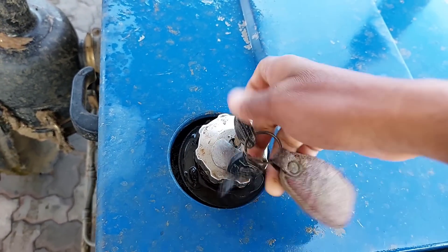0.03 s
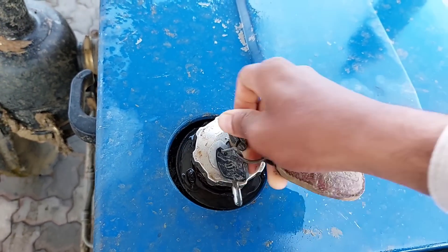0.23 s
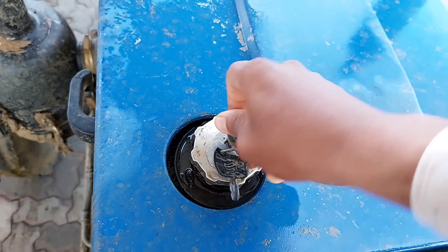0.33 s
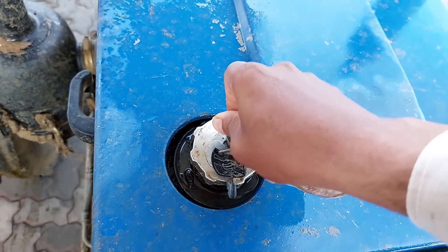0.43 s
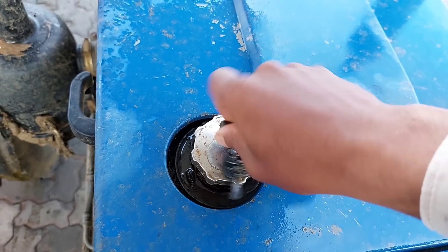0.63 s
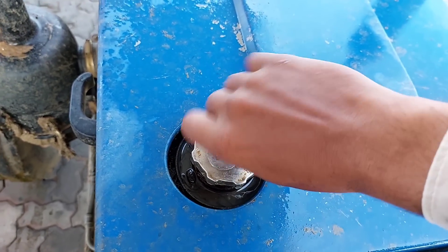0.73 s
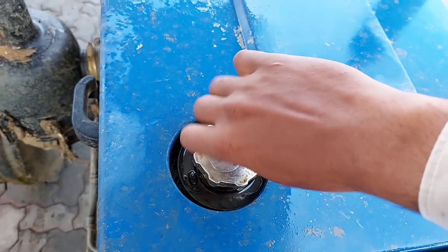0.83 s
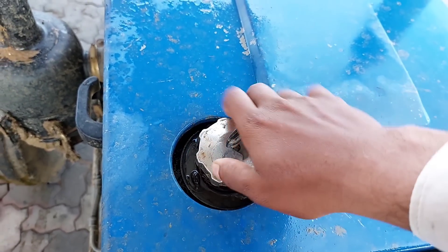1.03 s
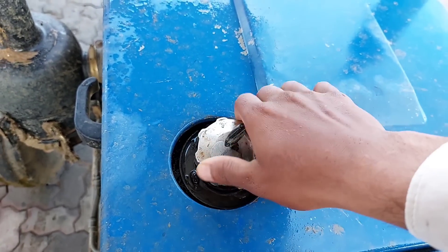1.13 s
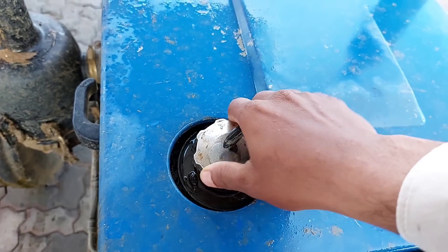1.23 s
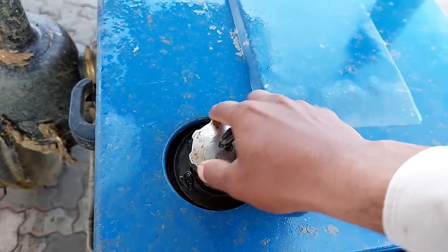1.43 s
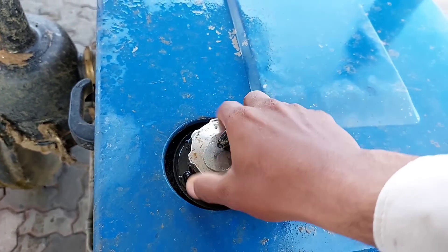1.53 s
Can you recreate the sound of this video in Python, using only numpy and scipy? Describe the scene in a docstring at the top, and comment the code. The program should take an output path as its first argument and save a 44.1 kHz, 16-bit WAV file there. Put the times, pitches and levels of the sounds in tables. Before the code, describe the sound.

Close to the microphone outdoors, a metal fuel cap is unlocked: small key clicks, a short scrape with dull thuds, then sharp snaps and a hollow ring from the tank. A bird whistles very faintly far away.

```python
"""A key ticks and rasps into the lock of a metal fuel cap, outdoors, close to a phone's microphones.
It scrapes over the pins and shakes the painted panel; the cap snaps, comes loose and the hollow
tank rings. Behind it lie a low rumble, a thin hiss and, far off, a faint falling whistle,
probably a bird."""
import sys
import numpy as np
from scipy import signal
from scipy.fft import rfft, irfft
from scipy.io import wavfile
from scipy.ndimage import uniform_filter1d

SR = 44100
rng = np.random.default_rng(int(sys.argv[2]) if len(sys.argv) > 2 else 0)


def transcribe(signal):
    """Save signal, clipped to [-1, 1], as a 16-bit WAV file at the path in sys.argv[1]."""
    frames = np.atleast_2d(signal).T
    limited = np.clip(frames, -1, 1)
    pcm = np.round(limited * 32767).astype(np.int16)
    wavfile.write(sys.argv[1], SR, pcm)


N = 70560
T = np.arange(N) / SR
FREQS = np.maximum(np.fft.rfftfreq(N, 1 / SR), 1)

# A click coming back off the bodywork. Each row: frequency in Hz, level in dB, 60 dB decay in seconds.
BODYWORK_ECHO = [(980, -43.5, 0.58), (2390, -43.5, 0.24), (4620, -40.5, 0.058), (7100, -35.5, 0.39),
                 (10100, -51.5, 0.33), (16000, -42, 0.21)]


def key_ticks():
    """The key and its ring tick against the cap, mostly left of centre; glancing touches are thinner."""
    # Each row: start in seconds, level in dB, lean to the left in dB, ring length factor, low cut in Hz.
    touches = [(0.0392, -23.5, 5.5, 0.99, 9500), (0.1397, -10, 13, 1, 510), (0.1654, -17.5, -1, 0.48, 5100),
               (0.45, -35, 5, 1, 3000), (0.5501, -23.5, 12.5, 0.83, 500), (0.562, -26.5, 10, 0.23, 2460),
               (0.708, -37, 16, 0.18, 2960), (0.7232, -32, 18, 0.21, 2900), (0.739, -35, 4, .4, 11000),
               (.752, -28.5, 19, 0.18, 11200), (0.7712, -34, 6, 0.33, 6000), (0.786, -27.5, 2, 0.75, 6100),
               (0.789, -29, 11.5, 0.25, 5950), (0.896, -42, 14, 0.81, 5100)]
    # The modes each key tick strikes: a low ring of the cap body at 845 Hz, then the key's own modes. Each row:
    # frequency in Hz, level in dB, base 60 dB decay in seconds.
    tick_modes = [(845, -44, .35), (2980, -27, .02), (5200, -16, .012), (6150, -6, .005), (6600, -2, .008),
                  (7400, -11, .012), (7900, -16, .008), (8570, -16, .015), (8950, -14, .009),
                  (10000, -17, .005), (10800, -17, .007), (11400, -13, .008), (14330, -14, .007)]
    echo, out = wash(BODYWORK_ECHO), 0
    for start, db, left_db, length, low_hz in touches:
        low_cut = signal.butter(2, low_hz, "high", fs=SR, output="sos")
        tick = signal.sosfilt(low_cut, click(tick_modes, length) + echo)
        out = out + at(tick * undb(db) * pan(left_db), start)
    return out


def cap_snaps():
    """The lock and the cap's lugs snap, and the bodywork throws the sound back."""
    # Each row: start in seconds, level in dB, lean to the left in dB, ring length factor.
    snaps = [(0.9284, -8.5, 14, 0.85), (0.994, -18, 0, 0.69), (1.045, -25.5, 9, 0.38),
             (1.1125, -33, 8, 0.22), (1.117, -26, 4, 0.11), (1.1322, -27, 13, 0.23),
             (1.138, -22.5, 8, 0.51), (1.190, -34, 11, 0.24), (1.203, -25, 1, 0.17), (1.218, -27, 10, 0.12),
             (1.2325, -7.5, 9.5, .6), (1.243, -25, 1.5, 1.5)]
    # The cap's modes. Each row: frequency in Hz, level in dB, base 60 dB decay in seconds.
    cap_modes = [(2985, -14, .022), (4100, -20, .01), (4650, -15, .008), (5500, -11, .012),
                 (5900, -8, .011), (6250, -15, .009), (7100, -18, .012), (7590, -18, .045),
                 (8750, -11, .012), (11520, -22, .022), (12300, -21, .008), (13250, -15, .02),
                 (14800, -21, .009), (15600, -21, .006)]
    echo = undb(-3.5) * wash(BODYWORK_ECHO)
    return sum(at((click(cap_modes, length) + echo) * undb(db) * pan(left_db), start)
               for start, db, left_db, length in snaps)


def click(modes, length):
    """Metal meets metal: a crack of contact noise and modes that differ a little with each grip."""
    # The contact noise. Each row: frequency in Hz, relative level in dB.
    crack_colour = [(1000, -48), (2400, -1), (3200, 1), (4200, -0.5), (5500, 7.5), (7000, -7), (9000, -2),
                    (10000, -7.5), (13000, 3), (16000, -7.5)]
    scatter = rng.standard_normal((len(modes), 2))
    struck = [(hz * (1 + .005 * detune), db + extra_db, t60)
              for (hz, db, t60), (detune, extra_db) in zip(modes, scatter)]
    crack = undb(-11.5) * noise(crack_colour) * decay(t60=.01)
    return (ring(struck, length, lag_s=.00009) + crack) * rise(seconds=.00016)


def pin_rasps():
    """The key rasps over the lock pins on its way in."""
    # Each row: start in seconds, relative level in dB, length in seconds.
    rasps = [(.246, -38.5, 0.014), (.2555, -21, 0.0029), (.2605, -24.5, 0.0096), (.2655, -45, 0.0073),
             (.2715, -17, 0.004), (.2795, -31, 0.011), (.287, -33, 0.023), (.3195, -24.5, 0.0035),
             (.325, -40.5, 0.011), (.349, -36, 0.0042)]
    # Each row: frequency in Hz, relative level in dB.
    rasp_colour = [(400, -28), (1400, 5), (2600, -6), (4000, -10), (6000, -6), (9000, -8), (16000, -11.5)]
    return undb(-11.5) * friction(rasps, rasp_colour, rough=.73)


def finger_rubs():
    """Fingers and key fob rub on the cap."""
    # Each row: start in seconds, level in dB, length in seconds.
    rubs = [(.555, -56.5, 0.099), (.695, -53.5, 0.11), (.80, -62.5, 0.13), (.93, -45, 0.14),
            (1.11, -44.5, 0.2)]
    # Each row: frequency in Hz, relative level in dB.
    rub_colour = [(200, 11.5), (700, 9), (1400, 6), (2000, -10.5), (5000, -4), (9000, -8.5), (16000, -14)]
    return friction(rubs, rub_colour, rough=.51)


def friction(strokes, colour, rough, grains_per_s=2700):
    """Stick-slip grains under strokes that swell quickly and die away."""
    force = 0
    for start, db, length in strokes:
        age = np.maximum(T - start + length / 10, 0) / length
        force = force + undb(db) * (1 - np.exp(-age * 10)) * np.exp(-age ** 2)
    grains = (rng.random(N) < grains_per_s / SR) * rng.standard_normal(N)
    grit = rough * unit(grains) + rng.standard_normal((2, N))
    scrape = unit(irfft(rfft(grit) * undb(along(FREQS, colour)), N))
    return force * scrape * pan(left_db=5.5)


def panel_thuds():
    """Each push on the cap thuds through the sheet metal."""
    # Each row: start in seconds, level in dB, treble cutoff in Hz.
    pushes = [(.140, -15.5, 3000), (.257, -8, 990), (.269, 0.5, 1050), (.2852, -1.5, 525), (0.322, -7, 910),
              (0.3506, -9, 457), (0.93, -6.5, 1490), (0.954, -3, 476)]
    # The panel's distinct modes, then the dense ones between them.
    # Each row: frequency in Hz, level in dB, 60 dB decay in seconds.
    panel_modes = [(92, -31, .13), (184, -34, .31), (250, -40, .25), (300, -31, .16), (390, -34, .14),
                   (470, -38, .2), (584, -35, .24), (790, -36, .15), (1336, -38, .2)]
    dense_modes = [(130, -49, .13), (200, -45, .17), (330, -40, .19), (600, -38, .19), (1300, -39, .17),
                   (2200, -47, .14), (5000, -60, .1)]
    thud = (ring(panel_modes) + wash(dense_modes)) * rise(seconds=.0027)
    return sum(at(soften(thud, hz) * undb(db), start) for start, db, hz in pushes)


def hollow_tank():
    """The cap breaks free and the hollow tank rings; later bumps stir its dense modes."""
    # Each row: start in seconds, level in dB, treble cutoff in Hz.
    blows = [(1.007, 3, 12400), (1.118, 3, 602), (1.232, -4.5, 497)]
    # The tank's distinct modes, then the dense ones between them.
    # Each row: frequency in Hz, level in dB, 60 dB decay in seconds.
    tank_modes = [(109, -41, 1.5), (128, -38, 1.6), (253, -48, 1.3), (313, -41, 1.3), (442, -44, 1.5),
                  (532, -45, 1.2), (708, -42, .85), (802, -37, 1.3), (1058, -36, .38), (1308, -43, .5),
                  (1426, -36, .32), (1540, -39, .34), (1689, -40, .42), (1771, -41, .35), (1974, -39, .42),
                  (2336, -37, .35), (2946, -38, .27)]
    dense_modes = [(80, -48, 1), (202, -51.5, 1), (326, -44, 1), (530, -51, 0.78), (766, -34, 0.5),
                   (1110, -37, 0.27), (1600, -36.5, 0.68), (2280, -33.5, 0.34), (4100, -36, 0.28),
                   (5840, -44, 0.23), (10000, -41, 0.13), (16000, -37, 0.051)]
    # The treble favours the left microphone. Each row: frequency in Hz, left over right in dB.
    tank_lean = [(400, -0.5), (750, 2), (1300, 4), (4400, 6), (8000, 10), (15000, 13)]
    attack = rise(seconds=.00067)
    stirred = sum(at(soften(wash(dense_modes) * attack, hz) * undb(db), start) for start, db, hz in blows)
    ringing = at(ring(tank_modes) * attack, start=blows[0][0])
    return lean(stirred + ringing, tank_lean)


def far_bird(fall_hz_per_s=13000, lowest_hz=2897):
    """A far whistle holds, then falls, and reaches the phone as a blur of echoes."""
    # Each row: start in seconds, opening pitch in Hz, level in dB, hold and length in seconds.
    whistles = [(0.066, 3516, -58.5, 0.012, 0.14), (0.382, 3360, -55.5, 0.044, 0.19),
                (0.787, 3334, -56, 0.055, 0.21)]
    echoes = unit(rng.standard_normal((2, N)) * decay(t60=.45)) / np.sqrt(N)
    calls = 0
    for start, hz, db, hold, length in whistles:
        age = T - start
        pitch = np.maximum(hz - fall_hz_per_s * np.maximum(age - hold, 0), lowest_hz)
        jitter = 1 + .055 * unit(uniform_filter1d(rng.standard_normal(N), size=24))
        swell = np.sqrt(np.abs(np.sin(np.pi * np.clip(age / length, 0, 1))))
        calls = calls + undb(db) * swell * np.sin(2 * np.pi * np.cumsum(pitch * jitter) / SR)
    return signal.fftconvolve(calls[None], echoes, axes=1)[:, :N]


def background():
    """The open air around the phone: a wavering low rumble and a steady thin hiss."""
    # Each row: frequency in Hz, relative level in dB.
    rumble_colour = [(20, 7), (35, 11.5), (50, 6), (70, 6.5), (100, 1), (160, -8.5), (280, -9),
                     (420, -24.5), (900, -29), (2000, -42)]
    hiss_colour = [(500, -27.5), (1200, 9.5), (2200, 10.5), (4500, 4), (5800, 9.5), (6700, 21.5),
                   (7800, 5.5), (9800, 20), (11500, 2), (16000, -74.5)]
    # Each row: time in seconds, level in dB.
    rumble_levels = [(0, -45.5), (.24, -38.5), (.3, -30.5), (.46, -41), (.62, -45.5), (.72, -44.5),
                     (.9, -43), (1.15, -42), (1.39, -46), (1.48, -56), (1.6, -45.5)]
    waver = undb(np.interp(T, *np.array(rumble_levels).T))
    return noise(rumble_colour) * waver + noise(hiss_colour) * undb(-62.5)


def ring(modes, length=1, lag_s=0):
    """Modes with their decays stretched by length; the right microphone hears them lag_s later."""
    samples = int(SR * min(2 * length * max(t60 for _, _, t60 in modes), N / SR))
    t = np.maximum(T[:samples] - np.array([[0], [lag_s]]), 0)
    out = sum(undb(db) * np.sin(2 * np.pi * hz * t) * decay(t60 * length, t) for hz, db, t60 in modes)
    return np.pad(out, ((0, 0), (0, N - out.shape[1])))


def wash(table):
    """Modes too dense to count: overlapping half-octave noise bands, each with its own decay."""
    spectrum, out = air(), 0
    for hz in 62.5 * 2 ** (np.arange(17) / 2):
        if hz > table[0][0] / 2:
            triangle = np.maximum(1 - 2 * abs(np.log2(FREQS / hz)), 0)
            band = unit(irfft(spectrum * triangle, N))
            out = out + band * undb(along(hz, table)) * decay(along(hz, table, column=2))
    return out / np.sqrt(2)


def air(unrelated_hz=1200):
    """Spectrum of noise at the two microphones: alike in the bass, unrelated in the treble."""
    mid, side = rfft(rng.standard_normal((2, N)))
    apart = np.clip(FREQS / unrelated_hz, .18, 1)
    return (mid + apart * side * np.array([[1], [-1]])) / np.sqrt(1 + apart ** 2)


def noise(colour):
    """Stereo noise of a given colour."""
    return unit(irfft(air() * undb(along(FREQS, colour)), N))


def soften(x, hz):
    """A softer contact loses the treble."""
    return signal.sosfilt(signal.butter(2, hz, fs=SR, output="sos"), x)


def lean(x, table):
    """Tilt a sound to the left by an amount that depends on frequency."""
    db = along(np.maximum(np.fft.rfftfreq(2 * N, 1 / SR), 1), table)
    return irfft(rfft(x, 2 * N) * undb(np.array([db, -db]) / 2))[:, :N]


def pan(left_db):
    """Left and right gains."""
    return undb(np.array([[left_db], [-left_db]]) / 2)


def rise(seconds):
    """An attack with the given time constant."""
    return 1 - np.exp(-T / seconds)


def decay(t60, t=T):
    """A fall of 60 dB every t60 seconds."""
    return np.exp(-np.log(1000) * t / t60)


def at(x, start):
    """Delay a stereo sound to its start in seconds."""
    return np.pad(x, ((0, 0), (int(start * SR), 0)))[:, :N]


def along(hz, table, column=1):
    """Read a table column on a log-frequency scale."""
    table = np.array(table, float)
    return np.interp(np.log(hz), np.log(table[:, 0]), table[:, column])


def undb(db):
    """Decibels to gain."""
    return 10 ** (np.asarray(db) / 20)


def unit(x):
    """Scale to rms 1."""
    return x / np.sqrt(np.mean(x ** 2) + 1e-20)


def scene():
    """Everything at the phone's two microphones, from the lock close by to the bird far off."""
    # The clicks' extra tilt. Each row: frequency in Hz, left over right in dB.
    click_lean = [(2000, -5.5), (6000, 3.5), (9000, 5.5), (13000, -2)]
    scrapes = pin_rasps() + finger_rubs()
    clicks = lean(key_ticks() + cap_snaps(), click_lean)
    return clicks + scrapes + panel_thuds() + hollow_tank() + far_bird() + background()


def record(dry, low_hz=65, top_hz=16600):
    """The phone cuts the deepest bass and the top."""
    low_cut = signal.butter(3, low_hz, "high", fs=SR, output="sos")
    top_cut = signal.ellip(10, .2, 80, top_hz, fs=SR, output="sos")
    return signal.sosfilt(top_cut, signal.sosfilt(low_cut, dry))


dry = scene()
out = record(dry)
transcribe(out)
```